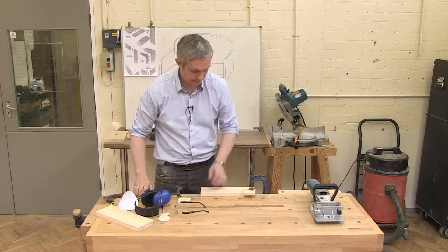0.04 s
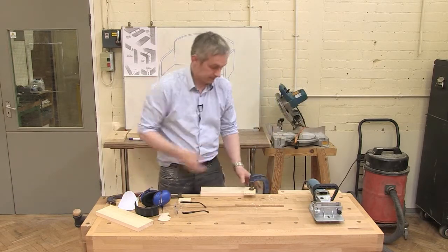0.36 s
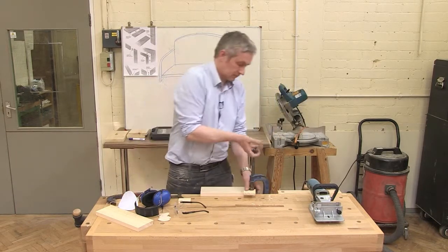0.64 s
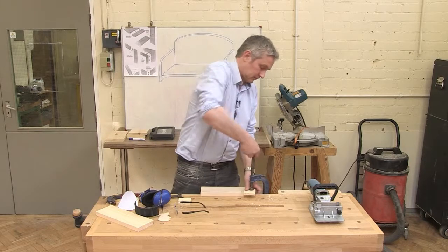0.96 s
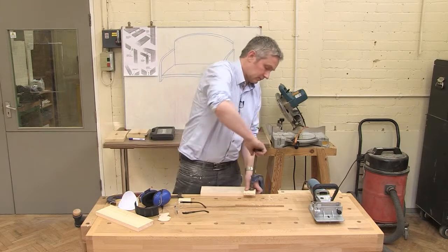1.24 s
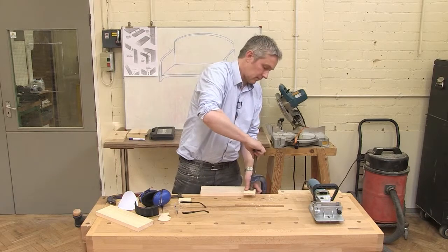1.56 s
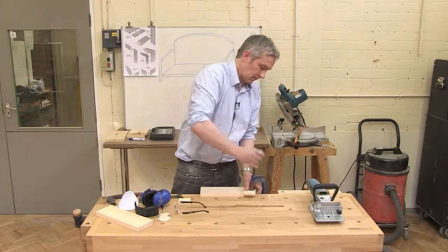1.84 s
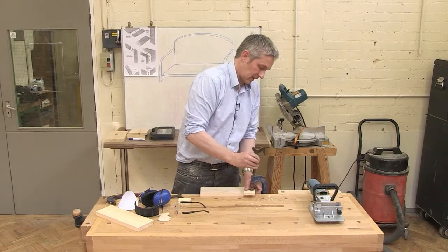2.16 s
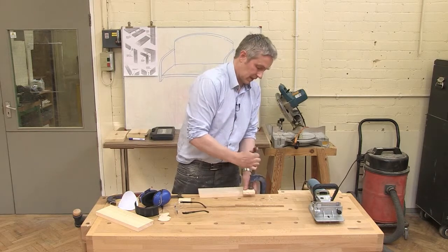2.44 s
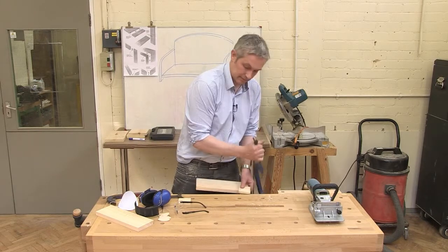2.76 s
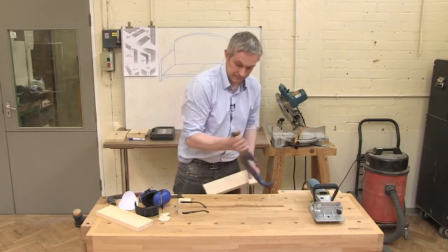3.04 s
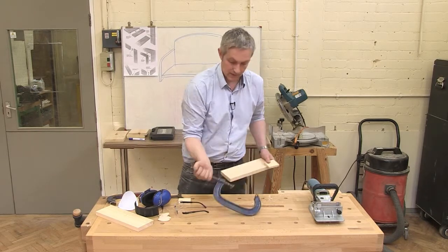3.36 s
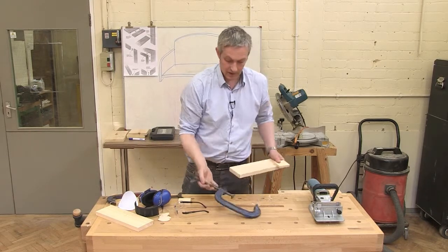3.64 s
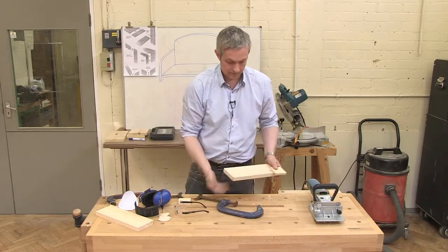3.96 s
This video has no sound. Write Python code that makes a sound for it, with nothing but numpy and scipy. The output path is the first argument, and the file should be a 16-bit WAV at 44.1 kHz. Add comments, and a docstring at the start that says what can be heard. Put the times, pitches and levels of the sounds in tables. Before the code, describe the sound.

An iron clamp is handled in an echoing workshop. Tools first clunk onto a wooden bench, the clamp's screw squeaks briefly, and a board ticks and bumps softly. Then the clamp lands with a loud clank and tips over.

```python
"""After a short dull click, tools thud and clank down on a wooden workbench in a hard-walled workshop.
An iron G-clamp is loosened from a board: its screw squeaks, rasps free and spins, and its handle clinks.
The board bumps and ticks under the hands and clacks loose. Then the clamp lands heavily on the bench
and tips over. Each blow makes the wood thud or the iron ring, and the walls echo it."""
import sys
import numpy as np
from scipy import signal
from scipy.fft import rfft, irfft
from scipy.io import wavfile

SR = 44100
rng = np.random.default_rng(int(sys.argv[2]) if len(sys.argv) > 2 else 0)


def wrap_up_sound(samples):
    """Save the sound to the file named by the first command line argument, as 16-bit audio."""
    columns = np.atleast_2d(samples).T
    # keep every value between -1 and 1, then stretch to whole-number steps
    tamed = np.clip(columns, -1, 1)
    steps = np.round(tamed * 32767).astype(np.int16)
    wavfile.write(sys.argv[1], SR, steps)


N = 176400
T = np.arange(N) / SR

# A short dull click as the sound begins, then blows on the bench.
# Each row: start in seconds, thud in dB, clatter in dB, clatter pitch in Hz.
DULL_KNOCKS = [(0.001, -31, -33.5, 624), (0.063, -26.5, -26, 368), (0.079, -27.5, -28.5, 496),
               (0.248, -33, -46, 376), (0.332, -40, -29, 600), (0.343, -21, -16.5, 556),
               (0.349, -31, -22, 880), (0.4, -32.5, -19, 930), (3.2852, -18, -9.5, 480),
               (3.2891, -7, -5.5, 417), (3.298, -22.5, -8.5, 647), (3.8896, -20, -13, 384),
               (3.8945, -22.5, -19.5, 900), (3.922, -22.5, -22, 1190), (3.949, -43, -22.5, 1180),
               (3.998, -22, -16.5, 1260)]
# Iron hits iron, with a crack: a short, unpitched snap of noise.
# Each row: start in seconds, ring in dB, favoured pitch in Hz, crack in dB, an unused number.
IRON_CLANKS = [(0.0612, -28, 10400, -19, 8000), (0.069, -32, 7500, -15, 5000),
               (0.079, -46, 11000, -23, 5000), (0.332, -37, 2900, -55, 3020),
               (0.343, -24.5, 3050, -14, 5000), (0.348, -16.5, 8000, -14.5, 4000),
               (0.398, -24, 3430, -49, 1500), (2.2209, -44, 2960, -40, 2650),
               (2.235, -44.5, 7800, -32, 3000), (3.1795, -37.5, 2300, -28, 8990),
               (3.287, -14, 11200, -28, 7000), (3.291, -15, 4600, -8, 2950), (3.297, -20, 12800, -17, 4000),
               (3.8953, -18.5, 7700, -22.5, 3500), (3.923, -41, 9600, -18, 3000)]
# The screw and jaw slip. Each row: start in seconds, length in seconds, base pitch in Hz, level in dB.
SCREW_SQUEAKS = [(0.062, 0.0095, 11900, -25.5), (0.078, 0.0072, 13100, -28), (1.074, 0.016, 8350, -41),
                 (1.091, 0.027, 5420, -33), (1.092, 0.009, 9700, -34.5), (1.093, 0.014, 2850, -34.5),
                 (1.102, 0.013, 3100, -27.5), (1.126, 0.0165, 2103, -38), (3.922, 0.0155, 2743, -26.5)]
# Hands bump the board; the row at 1.109 s is a faint low microphone thump as the screw squeaks.
# Each row: start in seconds, level in dB, pitch in Hz.
SOFT_BUMPS = [(1.05, -43.5, 300), (1.109, -39, 60.3), (1.255, -41, 229), (1.719, -51.5, 202),
              (2.01, -41.5, 201), (2.04, -37.5, 220), (2.455, -40.5, 520), (2.49, -38.5, 127),
              (2.594, -33, 107), (2.632, -39, 146), (2.656, -38, 229), (2.725, -43.5, 90)]
# Board and jaw tick. Each row: start in seconds, level in dB, pitch in Hz.
BOARD_TICKS = [(1.519, -48, 3900), (1.662, -55.5, 2500), (1.718, -51.5, 1210), (2.052, -49.5, 1980),
               (2.136, -36.5, 9000), (2.233, -39, 1900), (2.3, -49, 1890), (2.454, -33, 3700),
               (2.488, -39.5, 4000), (2.503, -40.5, 2310), (2.597, -46.5, 1000), (2.633, -34, 5560),
               (2.656, -35, 2200), (2.725, -30, 3700), (3.001, -34.5, 2400)]
# The thread rasps; hands and jaw rub the board. Each row: time in seconds, level in dB.
RASP_LEVELS = [(1.103, -45), (1.107, -26.5), (1.119, -32.5), (1.126, -26.5), (1.137, -36.5), (1.16, -46)]
RUB_LEVELS = [(2.3, -74), (2.5, -63), (2.88, -68), (2.985, -56.5), (3.02, -68), (3.15, -92)]
# The spinning screw. Each row: time in seconds, level in dB, pitch in Hz.
SPIN_CURVE = [(1.7, -82, 7800), (1.8, -71, 9500), (1.95, -68.5, 11200), (2.17, -73, 10800)]
# The notes each thing rings with. Each row: pitch in Hz, level in dB, seconds to fade by 60 dB (t60).
BENCH_NOTES = [(68.5, -1.5, 0.058), (111.7, 3.5, 0.15), (157, 0, 0.11), (231.6, 3, 0.16),
               (287.2, -4.5, 0.26), (609.3, -3.5, 0.23), (848, -16.5, 0.083), (1183, -13, 0.085)]
ROOM_NOTES = [(109, -24.5, 1), (225.8, -14.5, 0.98), (349, -17.5, 0.5), (447.4, -16, 0.99),
              (518, -17, 0.47)]
CLAMP_NOTES = [(2200, 2.5, 0.049), (2780, 7, 0.11), (3838, 9, 0.053), (4860, 1.5, 0.13), (5000, -3, .1),
               (6170, 1.5, 0.11), (6727, -3.5, 0.14), (7595, -7, 0.29), (8532, 0, 0.24), (9340, 2, 0.16),
               (10510, -7.5, 0.17), (11320, -5.5, 0.19), (11630, -7.5, 0.19), (12615, -2, 0.16),
               (13400, 0, 0.1), (14880, -8, 0.21)]
TOOL_NOTES = [(3666, 6.9, 0.14)]
SCREW_NOTES = [(1500, -3.5, 0.0094), (2220, -14, 0.03), (3100, -4.5, 0.019), (3340, 0, 0.021),
               (5070, -12, 0.036), (6600, -12, 0.14), (12400, -10, 0.033), (14900, -21, 0.12)]
HANDLE_NOTES = [(3849, -5, .08), (6158, -2, .18), (6541, -1, .19), (13070, -4, .1)]
BOARD_NOTES = [(1157, 4, 0.032), (1780, -6, 0.018), (2700, 0, 0.014)]
# How long the room echoes. Each row: pitch in Hz, seconds to fade by 60 dB.
ECHO_FADES = [(60, 0.6), (250, 0.86), (1000, 1.17), (2500, 1.0), (5000, 0.82), (9000, 0.87), (15000, 0.42)]
# The tone of the echo and of the room's steady hush. Each row: pitch in Hz, relative level in dB.
ECHO_LEVELS = [(50, -16), (150, -1.5), (400, 0.5), (900, 1), (2000, -7), (3500, -6), (8000, -9),
               (15000, -20)]
HUSH_LEVELS = [(20, -2), (50, 0), (110, 2.5), (300, -5), (1000, -15), (3000, -25), (8000, -28),
               (15000, -30.5)]


def from_db(db):
    """Turn decibels into a multiplier."""
    return 10 ** (np.asarray(db) / 20)


def rms_one(x):
    """Scale a sound to an average power of one."""
    return x / np.sqrt(np.mean(x ** 2) + 1e-20)


def at_hz(points, hz):
    """Read between a table's rows, spacing pitches by octaves."""
    pitches, values = np.transpose(points)
    return np.interp(np.log(hz + 1e-3), np.log(pitches), values)


def level(rows):
    """Loudness that follows rows of seconds and dB, silent outside them."""
    return from_db(np.interp(T, *np.transpose(rows), left=-150, right=-150))


def add(out, start, x):
    """Mix x into out at start seconds."""
    i = int(np.clip(start * SR, 0, N - 1))
    out[i:i + len(x)] += x[:N - i]


def band(x, low_hz, high_hz):
    """Keep the part of a sound between two pitches."""
    return signal.sosfilt(signal.butter(2, [low_hz, high_hz], "band", fs=SR, output="sos"), x)


def noise(gain, size=N):
    """Noise whose strength at each pitch follows gain(hz)."""
    hz = np.arange(size // 2 + 1) * SR / size + 1
    phases = np.exp(2j * np.pi * rng.random(len(hz)))
    return rms_one(irfft(gain(hz) * phases, size))


def hump(centre_hz, slope_db):
    """A broad peak whose sides fall by slope_db an octave."""
    return lambda hz: from_db(-slope_db * np.hypot(np.log2(hz / centre_hz), 1))


def burst(gain, t60, attack_s, size=8192):
    """One contact sets off so many short notes that they blend into noise."""
    t = T[:size]
    fade = from_db(-60 * t / t60) * (1 - np.exp(-t / attack_s))
    return rms_one(noise(gain, size) * fade) * np.sqrt(np.mean(fade ** 2))


def ring(notes, blur_hz=0, gain=lambda hz: 1, size=26000):
    """A struck thing rings with notes that each fade; if it is loose, their pitches blur."""
    t, out = T[:size], 0
    for k, (hz, db, t60) in enumerate(notes):
        blur = np.cumsum(rng.normal(size=size)) * np.sqrt(2 * np.pi * blur_hz / SR)
        fade = gain(hz) * from_db(db + rng.normal() - 60 * t / t60)
        out = out + fade * np.sin(2 * np.pi * hz * t + blur) * (-1) ** k
    return out


def bench():
    """After the opening click, blows make the bench thud and clatter and the room boom."""
    wood, boom = np.zeros(N), np.zeros(N)
    for start, thud_db, clatter_db, hz in DULL_KNOCKS:
        add(wood, start, from_db(thud_db - 6.5) * ring(BENCH_NOTES))
        add(wood, start, from_db(clatter_db) * burst(hump(hz, 12), t60=0.086, attack_s=0.0001))
        add(boom, start, from_db(thud_db) * ring(ROOM_NOTES, size=44100))
    return wood, boom


def bench_echo(wood, bands=17):
    """The room scatters the bench's clatter into noise that fades band by band."""
    out, edges = 0, np.geomspace(45, 16000, bands + 1)
    white = rng.standard_normal((2, N))
    for k, (low, high) in enumerate(zip(edges, edges[1:])):
        centre = np.sqrt(low * high)
        keep = from_db(-120 / (at_hz(ECHO_FADES, centre) * SR))  # share of energy left after one sample
        power = band(wood + 1e-12 * white[0], low, high) ** 2
        energy = signal.lfilter([1 - keep], [1, -keep], power)
        hiss = rms_one(band(white[k % 2], low, high))
        out = out + np.sqrt(energy) * hiss * from_db(at_hz(ECHO_LEVELS, centre))
    return out


def clanks(favour_db=10, favour_octaves=0.51):
    """The clamp cracks and rings, the spot struck favouring some notes; a tool rings as it is put down."""
    rings, cracks = np.zeros(N), np.zeros(N)
    for start, ring_db, spot_hz, crack_db, _ in IRON_CLANKS:
        def favour(hz):
            closeness = np.exp(-(np.log2(hz / spot_hz) / favour_octaves) ** 2)
            return from_db(favour_db * (closeness - 1.5))
        add(rings, start, from_db(ring_db) * ring(CLAMP_NOTES, blur_hz=20, gain=favour))
        add(cracks, start, from_db(crack_db) * burst(np.ones_like, t60=0.022, attack_s=0.00047))
    add(rings, 0.066, from_db(-27.5) * ring(TOOL_NOTES, blur_hz=70))
    return rings + signal.sosfilt(signal.butter(2, 14000, fs=SR, output="sos"), cracks)


def wall_echo(x, build_s=0.0015, size=65536):
    """Bounces off the hard walls blend into an echo that builds up and fades band by band."""
    t, hz = T[:size], np.arange(size // 2 + 1) * SR / size + 1
    white = rfft(noise(np.ones_like, size))
    tail, centres = 0, np.geomspace(40, 16000, 18)
    for k, centre in enumerate(centres):
        share = np.interp(np.log(hz), np.log(centres), np.arange(len(centres)) == k)
        fade = from_db(-60 * t / at_hz(ECHO_FADES, centre)) * (1 - np.exp(-(t / build_s) ** 2))
        gain = from_db(at_hz(ECHO_LEVELS, centre)) / np.linalg.norm(fade)
        tail = tail + gain * fade * irfft(white * share)
    return signal.fftconvolve(x, tail)[:N]


def squeaks(sag=0.145, settle=4, roughness=0.014, overtone_db=-13.5):
    """The screw and jaw slip, squeaking in short falling chirps."""
    out = np.zeros(N)
    for start, length, hz, db in SCREW_SQUEAKS:
        progress = np.arange(int(length * SR)) / (length * SR)
        wobble = noise(hump(300, slope_db=11), size=4096)[:len(progress)]
        pitch = hz * (1 + sag * np.exp(-settle * progress) + roughness * wobble)
        phase = 2 * np.pi * np.cumsum(pitch) / SR
        tone = sum(from_db(overtone_db * (k - 1)) * np.sin(k * phase) for k in (1, 2, 3) if k * hz < SR / 2)
        add(out, start, from_db(db) * np.sqrt(2) * np.sin(np.pi * progress) * tone)
    return out


def board(bump_t60=0.16, tick_cycles=80):
    """The handled board bumps, ticks, rubs and clacks free; the microphone thumps once."""
    out = np.zeros(N)
    for start, db, hz in SOFT_BUMPS:  # a low note with a duller thud around it
        add(out, start, ring([(hz, db, bump_t60)], blur_hz=23))
        add(out, start, from_db(db - 5.5) * burst(hump(hz, 11.5), t60=bump_t60, attack_s=0.0013))
    for start, db, hz in BOARD_TICKS:  # higher ticks die sooner
        add(out, start, from_db(db) * burst(hump(hz, 21.5), t60=tick_cycles / hz, attack_s=0.0004))
    add(out, 3.001, from_db(-32.5) * ring(BOARD_NOTES, blur_hz=40))
    return out + level(RUB_LEVELS) * noise(hump(4000, slope_db=3))


def rasp(slips_per_s=3000, grit_db=1.5):
    """The thread breaks loose in tiny uneven slips, each ringing the screw."""
    slipping = rng.random(N) < slips_per_s / SR
    slips = slipping * rng.normal(size=N) * np.sqrt(SR / slips_per_s) * level(RASP_LEVELS)
    screw = ring(SCREW_NOTES)
    ringing = signal.fftconvolve(slips, screw / np.linalg.norm(screw))[:N]
    return ringing + from_db(grit_db) * band(slips, 1600, 10000)


def spin(width_hz=1200, hiss_db=-1):
    """The freed screw swishes in its thread, rising in pitch as it gathers speed."""
    times, db, hz = np.transpose(SPIN_CURVE)
    phase = 2 * np.pi * np.cumsum(np.interp(T, times, hz)) / SR
    swish = rms_one(noise(lambda f: 1 / (1 + (f / width_hz) ** 2)) * np.sin(phase))
    hiss = from_db(hiss_db) * noise(hump(8300, slope_db=15))
    return level(np.c_[times, db]) * (swish + hiss)


def handle():
    """The screw's sliding handle clinks once."""
    out = np.zeros(N)
    add(out, 2.235, from_db(-40) * ring(HANDLE_NOTES, blur_hz=3))
    return out


def scene():
    """Bench, clamp and board echo over the room's hush and the fading tail of an earlier knock."""
    wood, boom = bench()
    iron = clanks()
    handling = squeaks() + board() + rasp() + spin() + handle()
    echo = wall_echo(from_db(-1) * iron + from_db(-3) * handling) + from_db(-1) * bench_echo(wood)
    knock_tail = from_db(-41 - 60 * T / 0.71) * noise(hump(420, slope_db=6))
    hush = from_db(-57.5) * noise(lambda hz: from_db(at_hz(HUSH_LEVELS, hz)))
    return (wood + boom + iron + handling + echo + knock_tail + hush)[None]


def record(dry, thump_db=-14, cutoff_hz=15700):
    """A slightly lopsided input adds faint low thumps to hits; peaks clip and the top treble is cut."""
    thump = band(np.abs(dry), 12, 35)
    clipped = np.clip(dry - from_db(thump_db) * thump, -1, 1)
    return signal.sosfilt(signal.ellip(10, .1, 80, cutoff_hz, fs=SR, output="sos"), clipped)


dry = scene()
out = record(dry)
wrap_up_sound(out)
```